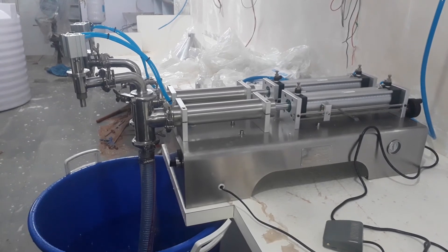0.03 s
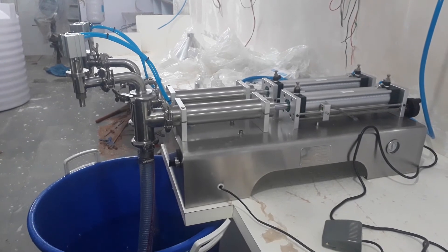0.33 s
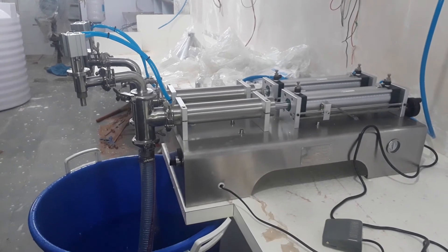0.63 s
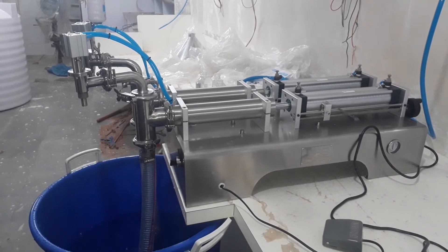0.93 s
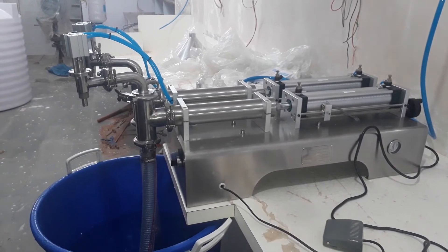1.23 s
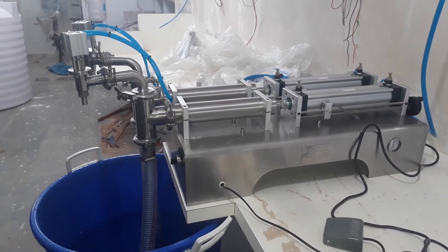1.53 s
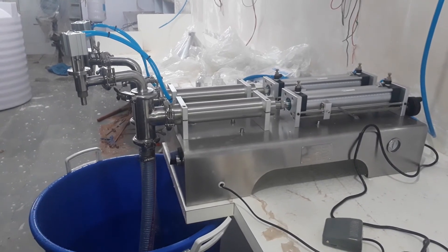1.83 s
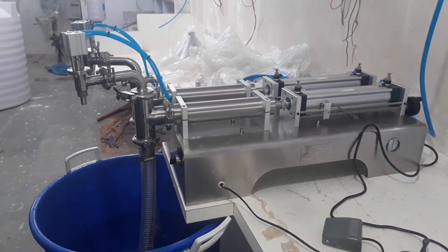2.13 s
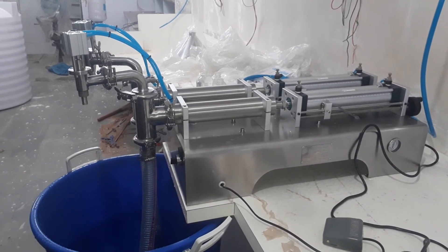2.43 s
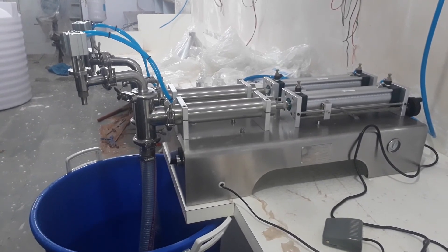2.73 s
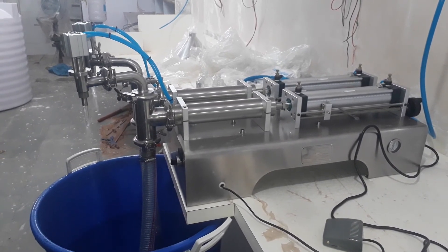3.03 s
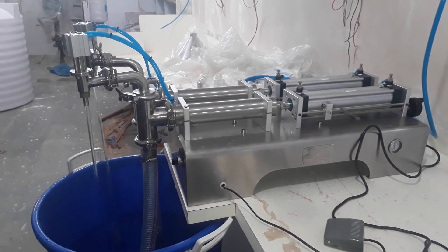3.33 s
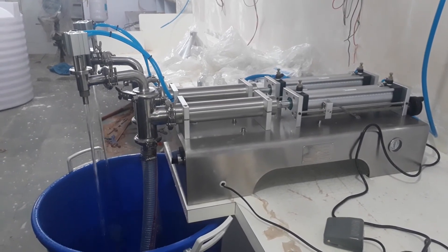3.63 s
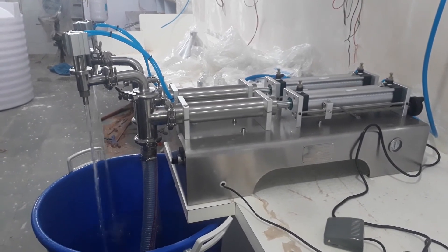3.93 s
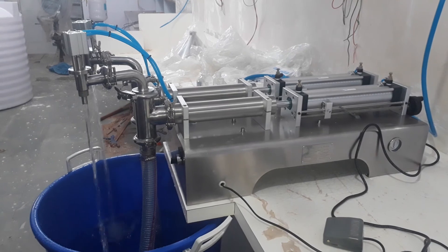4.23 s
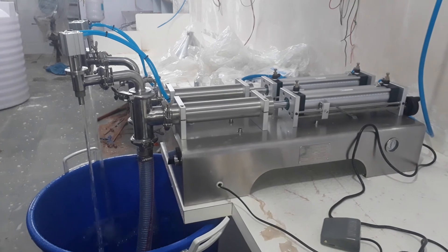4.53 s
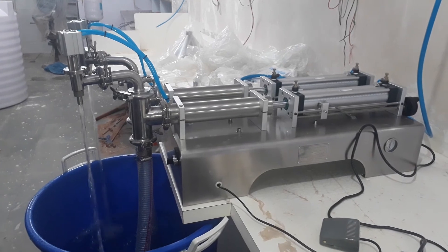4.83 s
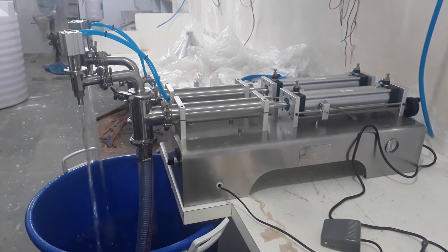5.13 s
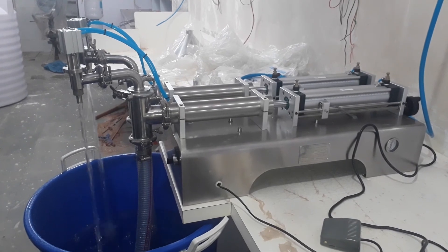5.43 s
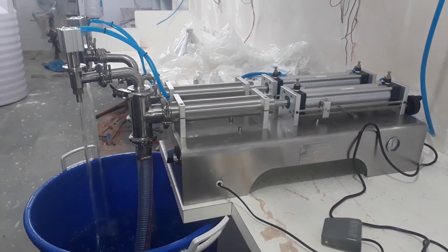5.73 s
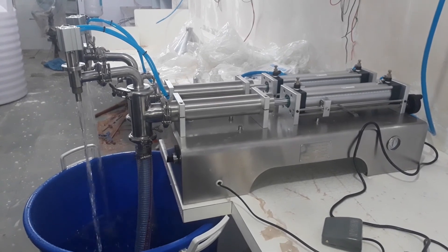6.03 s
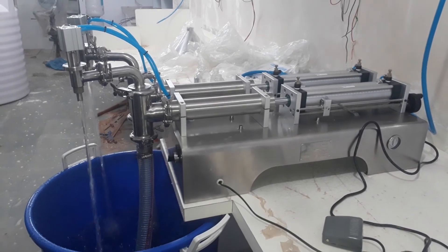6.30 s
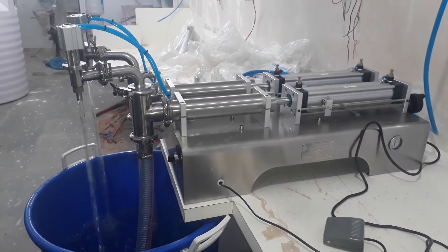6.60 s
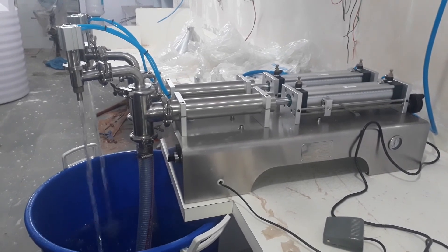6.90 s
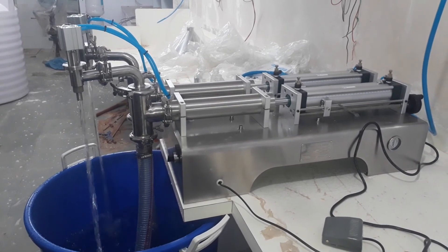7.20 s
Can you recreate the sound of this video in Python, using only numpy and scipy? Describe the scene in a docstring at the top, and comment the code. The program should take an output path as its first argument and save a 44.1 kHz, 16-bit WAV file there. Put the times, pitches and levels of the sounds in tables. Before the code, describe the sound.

A pneumatic filling machine gives a steady, bright hiss of air from the start, with three faint, dull bumps beneath it. At about 1.4 seconds the hiss dies away, leaving only soft workshop noise and a very faint air leak. At 2.9 seconds the valves release a sharp, loud blast of air, with a clunk and short rattle in the metal frame and a second quick puff. A surge of hiss follows and settles to a steady, lower level. At about 3.4 seconds a jet of liquid lands with a distinct plop in a large plastic drum. It keeps splashing until the end, around 7.4 seconds, with fine spatters, small bubbles and irregular hollow glugs, while the air hiss continues alongside. The hard-walled room adds a short echo to everything.

```python
"""Air hisses from an exhaust silencer in a hard-walled workshop as a pneumatic piston filler draws
liquid in, with a few dull bumps, and stops. After a pause the valves dump their air with a blast, the
actuator clunks in the frame and a second silencer hisses. A jet of liquid lands with a plop and keeps
splashing into a large plastic drum, where trapped bubbles ring and stir the air modes."""
import sys
import numpy as np
from scipy import signal
from scipy.fft import rfft, irfft
from scipy.io import wavfile
from scipy.ndimage import uniform_filter1d

SR = 44100
rng = np.random.default_rng(int(sys.argv[2]) if len(sys.argv) > 2 else 0)


def unload_wav(signal):
    """Save mono or channel-first audio to the path in sys.argv[1] as 16-bit WAV at rate SR, clipped to [-1, 1]."""
    wavfile.write(
        sys.argv[1],
        SR,
        np.round(np.clip(np.atleast_2d(signal).T, -1, 1) * 32767).astype(np.int16),
    )


N = 320166
TIME = np.arange(N) / SR


def undb(db):
    """Decibels to gain."""
    return 10 ** (np.asarray(db) / 20)


def unit(x):
    """Scale to rms 1."""
    return x / np.sqrt(np.mean(x ** 2))


def noise():
    """White noise."""
    return rng.standard_normal(N)


def walk(rate_hz):
    """Smooth random wander, spread near 1."""
    step = int(SR / rate_hz)
    return 1.2 * uniform_filter1d(np.repeat(noise()[:N // step + 1], step), step)[:N]


def convolve(x, response):
    """Convolution cut to N samples."""
    return signal.fftconvolve(x, response)[:N]


def colour(x, points, size=4096):
    """Minimum-phase filter through (frequency [Hz], gain [dB]) points."""
    hz, db = np.transpose(points)
    bins_hz = np.maximum(np.fft.rfftfreq(size, 1 / SR), 1)
    gain = undb(np.interp(np.log(bins_hz), np.log(hz), db))
    cepstrum = irfft(np.log(gain))
    cepstrum[1:size // 2] *= 2
    cepstrum[size // 2 + 1:] = 0
    return convolve(x, irfft(np.exp(rfft(cepstrum))))


def resonate(x, modes):
    """Parallel band-passes: (frequency [Hz], width [Hz], gain [dB])."""
    return sum(undb(db) * signal.lfilter(*signal.iirpeak(hz, hz / width_hz, fs=SR), x)
               for hz, width_hz, db in modes)


def narrowband(x, modes):
    """Two passes through the same resonances, rms 1."""
    return unit(resonate(resonate(x, modes), modes))


def fade(start_s, t60_s, rise_s=0.0018):
    """Exponential attack and decay."""
    age_s = np.maximum(TIME - start_s, 0)
    return (1 - np.exp(-age_s / rise_s)) * np.exp(-np.minimum(np.log(1000) * age_s / t60_s, 100))


def ramp(start_s, length_s):
    """Linear rise from 0 to 1."""
    return np.clip((TIME - start_s) / length_s, 0, 1)


def room(x, wet_db, t60_s=0.75, treble_t60_s=0.37, crossover_hz=7500):
    """Direct sound plus dense wall reflections; treble dies first."""
    low = signal.sosfilt(signal.butter(2, crossover_hz, fs=SR, output="sos"), noise())
    high = signal.sosfilt(signal.butter(2, crossover_hz, "high", fs=SR, output="sos"), noise())
    tail = (low * fade(0.0019, t60_s) + high * fade(0.002, treble_t60_s))[:SR]
    wet = undb(wet_db)
    return (x + wet * convolve(x, tail / np.linalg.norm(tail))) / np.hypot(1, wet)


def silencer(flow, spectrum, modes, flutter_db):
    """Turbulent air leaves a porous silencer, ringing its cavity and the steel housing."""
    turbulence = noise()
    hiss = unit(colour(turbulence + resonate(turbulence, modes), spectrum))
    return hiss * flow * undb(flutter_db * walk(30))


# First silencer, hiss: (frequency [Hz], gain [dB])
DRAW_SPECTRUM = [(70, -26), (200, -30.5), (450, -28), (1400, -18.5), (2200, -18), (2900, -20),
                 (3900, -16.5), (4800, -5.5), (6100, -4), (6900, -12), (7900, -17), (9000, -16),
                 (9700, -24), (15500, -26.5)]
# Its cavity and housing: (frequency [Hz], width [Hz], gain re plain hiss [dB])
DRAW_MODES = [(287, 28, 5.5), (473, 35, 11.5), (686, 28, 4.5), (876, 120, 5.5), (1080, 32, -1),
              (1332, 48, 8), (1475, 90, 2), (1860, 67, 2.5), (2050, 65, 4), (2332, 40, 6.5), (3140, 28, 0),
              (3470, 40, 0), (4463, 22, 8.5), (4880, 22, 3.5), (5170, 65, -3.5), (5456, 46, 4),
              (5680, 18, -2), (5810, 25, 4.5), (5852, 32, 0.5), (6380, 59, 2.5), (7020, 40, 4),
              (7130, 30, 3.5), (8700, 50, 2.5), (9200, 120, -4), (10200, 100, -1), (10500, 70, 1),
              (11700, 160, -3), (13600, 120, -2), (14500, 240, 0)]


def draw_exhaust(stop_s=1.366, sag_db_per_s=1.4, release_db_per_s=190):
    """Drawing stroke: the hiss sags with the pressure and dies at the piston's stop."""
    stopped_s = np.maximum(TIME - stop_s, 0)
    flow = undb(-18.5 - sag_db_per_s * TIME - release_db_per_s * stopped_s)
    return silencer(flow, DRAW_SPECTRUM, DRAW_MODES, flutter_db=0.97)


# Workshop background: (frequency [Hz], gain [dB])
SHOP_SPECTRUM = [(30, -12), (85, -9.5), (200, -9), (390, -4), (600, -7.5), (1000, -6.5), (2200, -9.5),
                 (3600, -18), (4300, -16), (6000, -15.5), (7400, -25.5), (11500, -27.5), (13400, -32),
                 (15500, -36)]


def workshop():
    """Soft room noise and the thin hiss of a leaking fitting."""
    background = undb(-46.5) * unit(colour(noise(), SHOP_SPECTRUM)) * undb(0.5 * walk(4.3))
    leak = undb(-63) * narrowband(noise(), [(8560, 650, 0), (8870, 550, -1)])
    return background + leak


# Piston bumps, drawing stroke: (time [s], level [dB])
PISTON_BUMPS = [(.485, -40), (.825, -42), (1.345, -37.5)]


def piston_bumps():
    """The sliding piston nudges the bench, which thuds."""
    push = sum(undb(db) * fade(s, t60_s=0.22, rise_s=0.0096) for s, db in PISTON_BUMPS)
    return narrowband(noise(), [(97, 42, 0)]) * push


# Valve air dumps: (time [s], level [dB], t60 [s])
VALVE_BLASTS = [(2.896, -9, 0.28), (2.912, -27, 0.14), (3.057, -14, 0.066)]
# Dumped air: (frequency [Hz], gain [dB])
BLAST_SPECTRUM = [(350, -37), (600, -7), (716, -34), (966, -8), (1450, -8), (1690, -15), (2100, -10),
                  (2830, -10.5), (3070, -19), (4750, -3), (7430, -4.5), (8870, -4), (15500, -17)]


def valve_blasts():
    """Small chambers empty at once; each hiss falls with the pressure."""
    pressure = sum(undb(db) * fade(s, t60_s, rise_s=0.0015) for s, db, t60_s in VALVE_BLASTS)
    return unit(colour(noise(), BLAST_SPECTRUM)) * pressure


# Actuator blows: (time [s], relative level [dB])
ACTUATOR_KNOCKS = [(2.897, -12.5), (2.916, -24.5), (2.935, -32), (2.973, -14.5), (3.001, -23)]
# Frame and bench: (frequency [Hz], t60 [s], gain [dB])
FRAME_MODES = [(92, 0.23, -23), (134, 0.26, -11), (165.4, 0.36, 7.5), (254, 0.42, -6.5), (295, .3, -4),
               (417, 0.22, -26), (489, 0.13, 5), (530, 0.14, 3), (680, 0.048, -10), (909, 0.18, -3),
               (993, .12, -1), (1430, 0.019, 7.5), (2050, 0.032, 1)]


def actuator_knocks():
    """Each blow of the valve actuator rings the frame; loose fittings rattle along."""
    blows = np.zeros(N)
    for s, db in ACTUATOR_KNOCKS:
        blows[int(s * SR)] += undb(db)
    t = TIME[:SR]
    ring = sum(undb(db - 60 * t / t60_s) * np.sin(2 * np.pi * hz * t) for hz, t60_s, db in FRAME_MODES)
    rattle_spectrum = [(55, -46), (100, -2), (520, -3), (700, -7), (1200, -14), (3000, -14.5),
                       (9000, -47)]
    rattle = unit(colour(noise(), rattle_spectrum)) * fade(ACTUATOR_KNOCKS[0][0], t60_s=0.8)
    return undb(-9) * convolve(blows, ring) + undb(-20.5) * rattle


# Second silencer, hiss: (frequency [Hz], gain [dB])
FILL_SPECTRUM = [(70, -34), (200, -14.5), (600, -12.5), (1400, -5), (2200, -6), (3000, -9.5), (3900, -9.5),
                 (4800, 2), (6300, 2), (7300, -9.5), (8150, -15.5), (8900, -8), (9800, -18.5),
                 (15500, -22.5)]
# Its cavity and housing: (frequency [Hz], width [Hz], gain re plain hiss [dB])
FILL_MODES = [(160, 12, 4), (1270, 29, 4.5), (1366, 78, 4.5), (2034, 35, 1), (2107, 34, 4.5), (2296, 46, 2),
              (3445, 50, 0.5), (4640, 30, -17), (4640, 30, -6), (5030, 51, 0.5), (5200, 35, 4),
              (5490, 25, -2.5), (5780, 40, -6), (6320, 21, 0), (7760, 150, -7), (8830, 50, -4)]


def fill_exhaust(start_s=2.92, attack_s=0.018):
    """Filling stroke: stored pressure surges out, then the hiss follows the piston's speed."""
    surge = undb(-19.5) * fade(start_s, t60_s=0.64, rise_s=attack_s)
    speed = undb(-3.5 * (1 - ramp(start_s=3.46, length_s=0.36)))
    running = undb(-27) * speed * ramp(start_s, attack_s)
    return silencer(np.hypot(surge, running), FILL_SPECTRUM, FILL_MODES, flutter_db=0.46)


# Sharpest drop impacts: (time [s], relative level [dB])
SPATTER_HITS = [(3.33, -16), (3.3799, -15), (3.813, -14), (3.995, -15), (4.5423, -13), (5.254, -8.5),
                (5.3889, -13), (5.4757, -13), (5.9631, -11), (6.2963, -14)]
# Drop slap: (frequency [Hz], gain [dB])
SPATTER_SPECTRUM = [(500, -20), (3000, -28), (7500, -3.5), (10000, 8.5), (12500, -5.5), (15500, -7)]


def spatters():
    """Single drops slap the surface."""
    slaps = sum(undb(db) * fade(s, t60_s=0.011, rise_s=0.0006) for s, db in SPATTER_HITS)
    return undb(-6.5) * unit(colour(noise(), SPATTER_SPECTRUM)) * slaps


JET_LANDS_S = 3.36
# Spurts of the jet: (time [s], gain [dB])
JET_SPURTS = [(3.72, 2.5), (3.93, 1), (4.27, 1), (6.1, 1), (6.73, 2.5)]


def jet_flow(spurt_width_s=0.048):
    """Jet strength at the surface: builds, spurts and wavers."""
    build_db = -3 * (1 - ramp(JET_LANDS_S, length_s=0.42))
    spurt_db = sum(db * np.exp(-np.minimum(((TIME - s) / spurt_width_s) ** 2, 20))
                   for s, db in JET_SPURTS)
    waver_db = 0.5 * walk(8)
    return ramp(JET_LANDS_S, length_s=0.016) * undb(build_db + spurt_db + waver_db)


def drops(rate_hz, spread_db, max_spreads=3.45):
    """Random impacts, many small, a few large."""
    size = undb(spread_db * np.minimum(rng.exponential(size=N), max_spreads))
    return (rng.random(N) < rate_hz / SR) * size * np.sign(noise())


# Jet impact: (frequency [Hz], gain [dB])
SPLASH_SPECTRUM = [(150, -27.5), (400, -2), (600, -12.5), (1000, -10.5), (1400, 4), (2300, 1), (3300, -2.5),
                   (5000, 2.5), (7500, -3.5), (10000, -12), (13000, -13.5), (15500, -20)]


def splash():
    """The jet hits the liquid as dense, uneven impacts."""
    impacts = drops(rate_hz=5000, spread_db=3) * undb(1.86 * walk(22))
    return unit(colour(impacts, SPLASH_SPECTRUM))


# Fine droplets: (frequency [Hz], gain [dB])
SPRAY_SPECTRUM = [(3000, -30), (7500, -5), (9800, 4.5), (11200, -1), (12700, -2), (15500, -8)]


def spray():
    """Droplets land beside the jet, each a few milliseconds of crackle."""
    landings = drops(rate_hz=200, spread_db=5.5, max_spreads=2.64)
    burst = fade(0, t60_s=0.0068, rise_s=0.0002)[:SR]
    energy = convolve(landings ** 2, burst ** 2)
    return unit(colour(noise() * np.sqrt(np.abs(energy)), SPRAY_SPECTRUM))


def bubbles(count, low_hz, high_hz, q, glide, spread_db):
    """Air dragged under by the jet rings as bubbles, each rising in pitch as it dies."""
    out = np.zeros(N + SR)
    for when, pitch, size in rng.random((count, 3)):
        hz = low_hz * (high_hz / low_hz) ** pitch
        t = np.arange(int(2 * q / hz * SR)) / SR
        age = t * hz / q
        start = int(SR * (JET_LANDS_S + when * (TIME[-1] - JET_LANDS_S)))
        ring = np.sin(2 * np.pi * hz * t * (1 + glide * age)) * np.exp(-np.pi * age)
        out[start:start + len(t)] += undb(-spread_db * np.log(size + 0.02)) * ring
    return unit(out[:N])


# Air in the drum: (frequency [Hz], width [Hz], gain [dB])
DRUM_MODES = [(165, 42, -6), (226, 7.4, 5), (271.3, 42, 7), (486, 68, 10), (729, 57, 8), (942, 71, 10)]


def drum_churn(flow):
    """Big bubbles and the thrashing jet excite the drum's air, harder at each glug."""
    gulps = bubbles(count=340, low_hz=169, high_hz=614, q=5.4, glide=0.057, spread_db=1)
    thrash_spectrum = [(50, -27), (150, 6), (1000, -1), (3000, -12)]
    thrash = unit(colour(drops(rate_hz=900, spread_db=3), thrash_spectrum))
    boom = undb(-1) * unit(resonate(undb(-6.5) * gulps + thrash, DRUM_MODES))
    steady = flow * undb(-39.5 + 1.4 * walk(12))
    glug_power = sum((undb(-4) * glug_envelope(s, db)) ** 2 for s, _, db in AIR_POCKETS)
    return boom * np.sqrt(steady ** 2 + glug_power)


def pour():
    """Splash, spray, small bubbles and drum boom follow one jet flow."""
    flow = jet_flow()
    fizz = bubbles(count=1200, low_hz=620, high_hz=3780, q=14, glide=0.086, spread_db=2)
    surface = undb(-32.5) * splash() + undb(-41) * spray() + undb(-45) * fizz
    return surface * flow + drum_churn(flow)


def plop(centre_s=3.3848, pitch_hz=1024, width_s=0.0022):
    """The head of the jet traps one big bubble that swells and dies within a few cycles."""
    t = TIME - centre_s
    swell = np.exp(-np.minimum((t / width_s) ** 2, 100))
    return undb(-9) * swell * np.sin(2 * np.pi * pitch_hz * t)


def glug_envelope(start_s, level_db):
    """Collapse of one air pocket."""
    return undb(level_db) * fade(start_s, t60_s=0.29, rise_s=0.007)


# Air pockets collapsing under the jet: (time [s], pitch [Hz], level [dB])
AIR_POCKETS = [(3.525, 496, -34), (3.707, 497, -31), (3.83, 235, -32), (4.155, 470, -28.5),
               (4.265, 280, -32.5), (4.28, 486, -36), (4.33, 235, -35), (4.775, 228, -33), (5.32, 241, -38),
               (5.47, 248, -32.5), (5.48, 495, -37), (5.6, 220, -34), (5.7, 220, -37), (6.299, 245, -37),
               (6.44, 490, -36), (6.55, 238, -39), (6.69, 270, -35), (6.79, 230, -34), (6.951, 275, -34.5)]


def glugs(q=3.6):
    """Each pocket breaks into like-sized bubbles ringing around one pitch."""
    stir = noise()
    return sum(narrowband(stir, [(hz, hz / q, 0)]) * glug_envelope(s, db) for s, hz, db in AIR_POCKETS)


def scene():
    """Machine and drum in one room; two identical channels."""
    hiss = room(draw_exhaust() + fill_exhaust(), wet_db=-8, t60_s=0.65, treble_t60_s=0.25)
    frame = room(piston_bumps() + actuator_knocks(), wet_db=-4, t60_s=0.69)
    valves = room(valve_blasts(), wet_db=-6.5)
    liquid = room(spatters() + pour() + glugs(), wet_db=-7.5, treble_t60_s=0.39)
    landing = room(plop(), wet_db=-5.5, t60_s=1.3)
    return np.tile(hiss + workshop() + frame + valves + liquid + landing, (2, 1))


def record(dry, low_cut_hz=76, high_cut_hz=15700):
    """Deep bass cut, faint rumble added, top cut."""
    thin = signal.sosfilt(signal.butter(8, low_cut_hz, "high", fs=SR, output="sos"), dry)
    rumble = undb(-76.5) * unit(colour(noise(), [(15, -10), (45, 3), (70, -15), (150, -30)]))
    return signal.sosfilt(signal.ellip(12, 0.1, 80, high_cut_hz, fs=SR, output="sos"), thin + rumble)


dry = scene()
out = record(dry)
unload_wav(out)
```